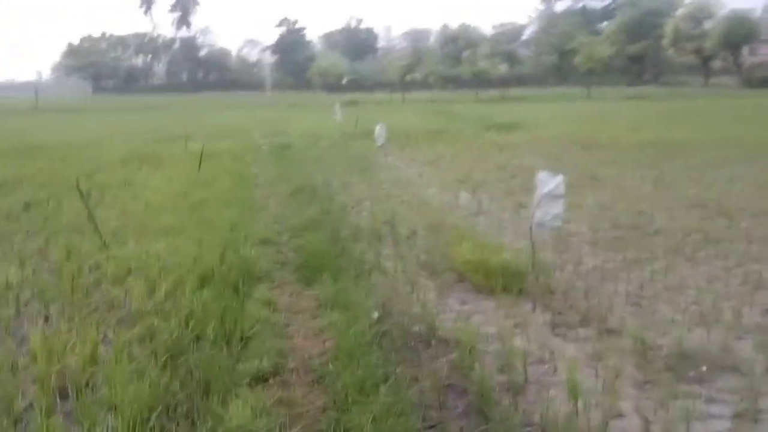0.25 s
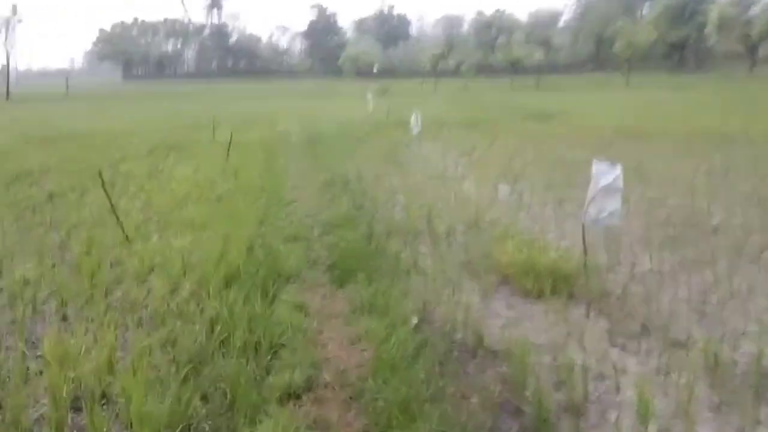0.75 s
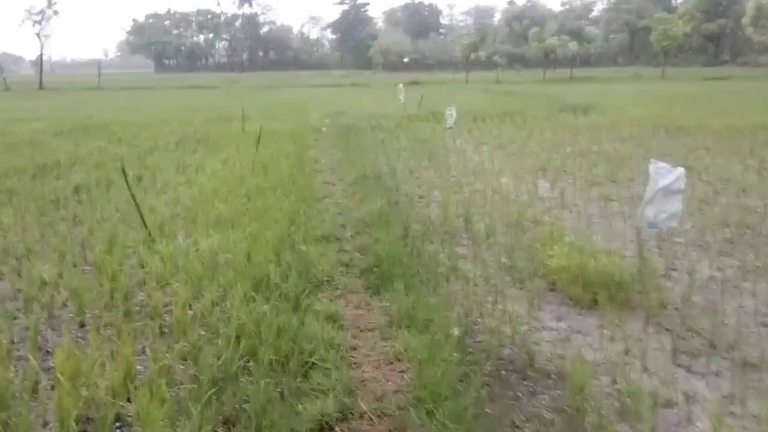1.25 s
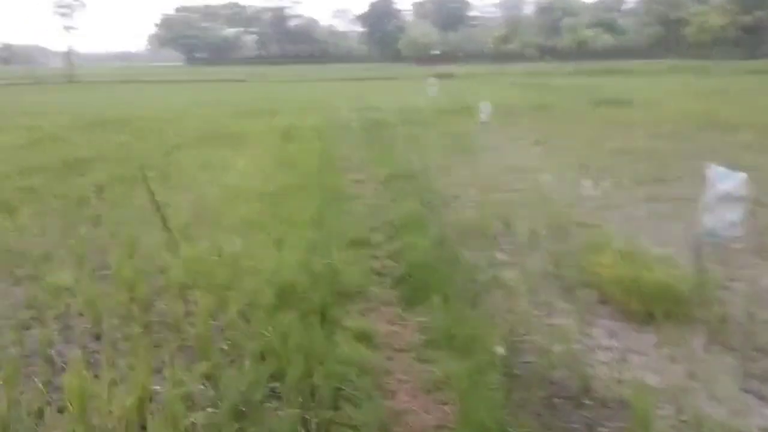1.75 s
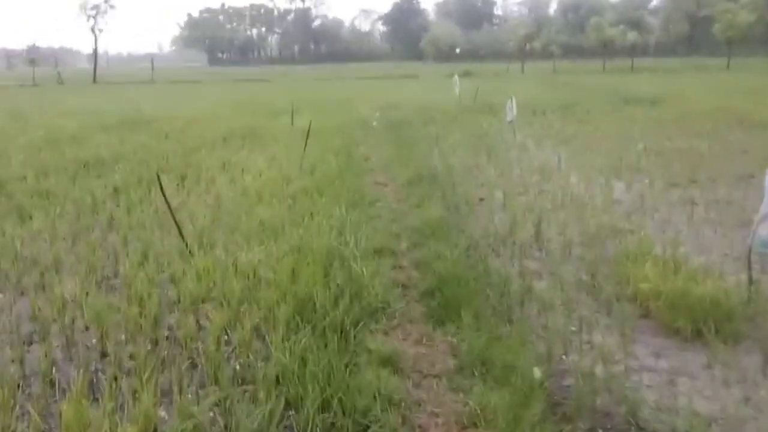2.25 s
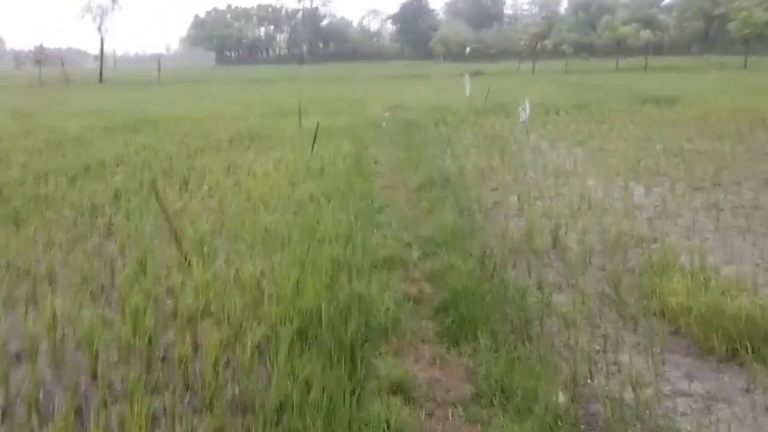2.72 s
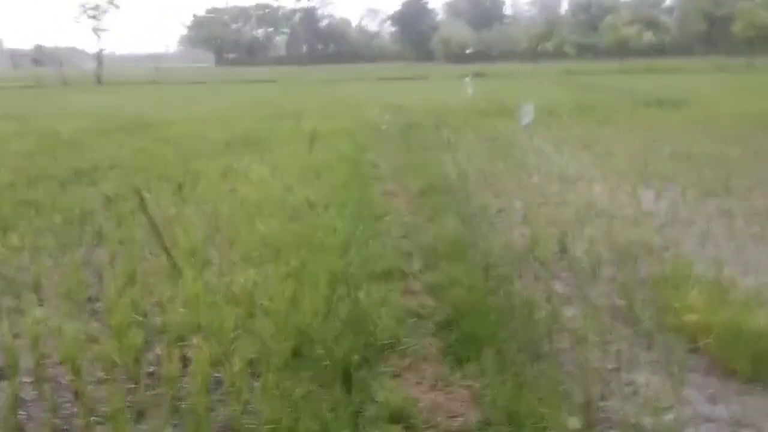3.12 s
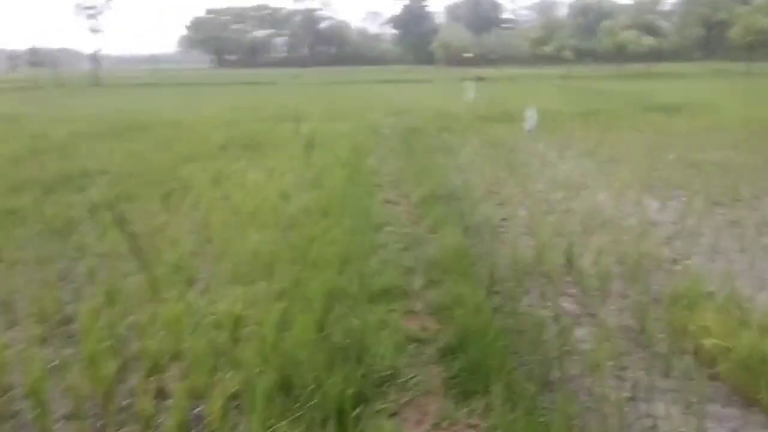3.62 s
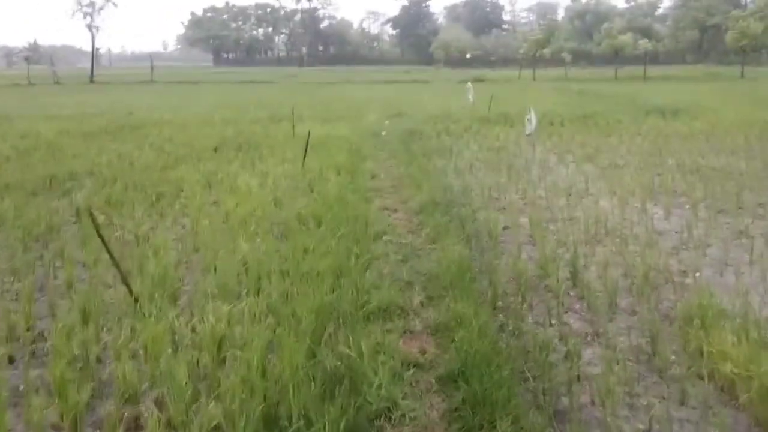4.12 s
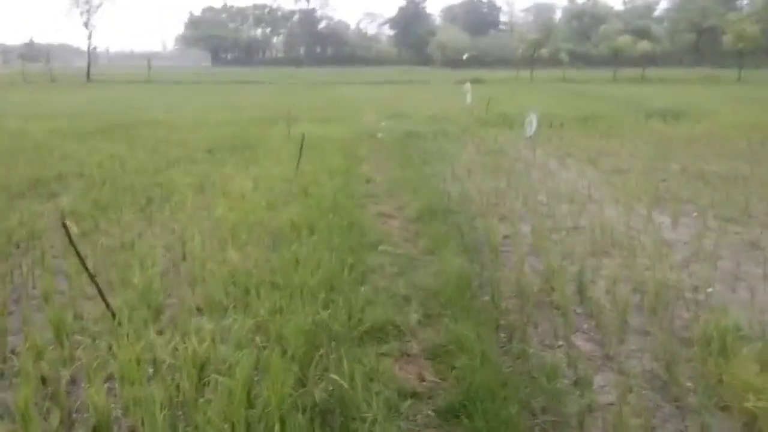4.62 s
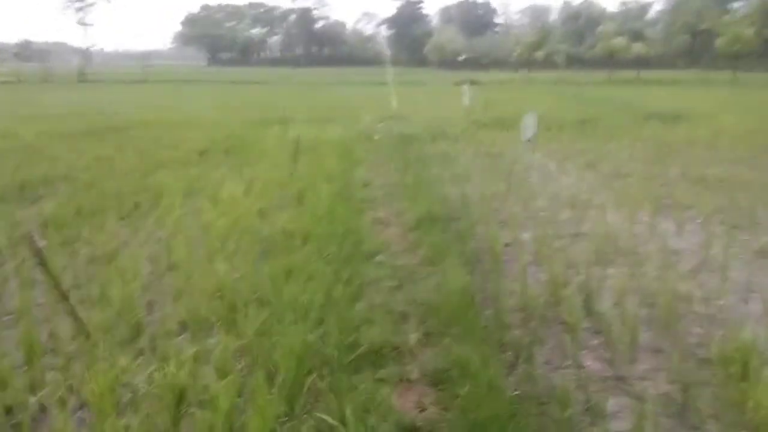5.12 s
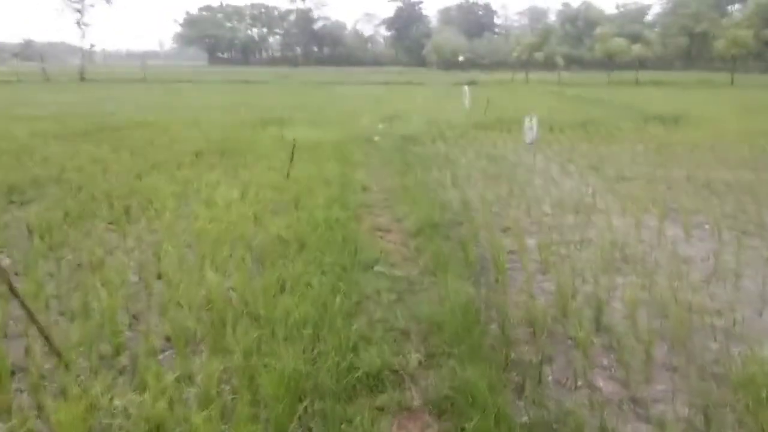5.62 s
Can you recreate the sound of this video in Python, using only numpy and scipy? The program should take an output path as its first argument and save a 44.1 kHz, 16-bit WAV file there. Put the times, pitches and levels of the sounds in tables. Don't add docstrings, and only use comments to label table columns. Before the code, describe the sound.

A phone under an umbrella in an open wet field, no reverberation. From 0 to about 1.2 s heavy rain drums densely on taut cloth, crisp overlapping taps with a dull mid-range body and thin hiss, while wind buffets the microphone in low thumps, strongest around 0.4, 0.8 and 1.13 s. Between 1.2 and 1.7 s noise suppression pushes the rain down in ragged steps; the wind dies by 2 s. Short watery, narrow-band pips remain. Drumming bursts back at about 2.4 and 2.55 s, and again near 3.15-3.4 s, fading quickly. A hard gust booms from 2.55 to 3.3 s, with violent thumps near 2.75 s. From 3.5 to 5.2 s it is nearly silent, with isolated blips and chirpy drips, some low and hollow, some bright, each sinking within a tenth of a second. At 5.3-5.8 s a final gust rumbles and thuds, peaking near 5.5 s, with few pips.

```python
import sys
import numpy as np
from scipy import signal
from scipy.fft import rfft, irfft
from scipy.io import wavfile
from scipy.ndimage import uniform_filter1d, map_coordinates

SR = 44100
rng = np.random.default_rng(int(sys.argv[2]) if len(sys.argv) > 2 else 0)


def output_pcm(signal):
    pcm = np.clip(np.atleast_2d(signal).T, -1, 1) * 32767
    wavfile.write(sys.argv[1], SR, np.round(pcm).astype(np.int16))


def voltage_ratio(decibels):
    exponent = np.asarray(decibels, float) / 20
    return 10 ** exponent


N = 258867

# (frequency [Hz], density [dB per Hz])
CLOTH_COLOUR = [(24, -50), (40, -19), (150, -2.5), (247, -1.5), (472, -1), (722, -3), (817, -0.5),
                (1380, -1), (1640, -4.5), (4030, -18), (6980, -26.5), (8960, -36), (15500, -32.5)]
RINGING_HZ = [700, 1350, 2150, 2600, 3000, 3600, 4450, 4750, 5300, 6100, 6900, 7400, 8500, 9800]
LEARNT_S = 1.155


def evened(x):
    return x / np.sqrt(np.mean(x ** 2) + 1e-20)


def read(points, hz):
    f, value = np.transpose(points)
    return np.interp(np.log(hz + 1), np.log(f + 1), value)


def add(mix, s, sound):
    part = mix[round(s * SR):][:len(sound)]
    part += sound[:len(part)]


def coloured(x, points):
    gain = voltage_ratio(read(points, np.fft.rfftfreq(len(x), 1 / SR)))
    return irfft(rfft(x) * gain, len(x))


def lumps(size, count=N):
    smooth = uniform_filter1d(rng.standard_normal(count), size)
    return evened(uniform_filter1d(smooth, size))


def tap(ripple_db, tilt_db, splash):
    hz = np.fft.rfftfreq(2048, 1 / SR)
    db = read(CLOTH_COLOUR, hz) + ripple_db * lumps(size=7, count=len(hz))
    db += tilt_db * np.log2(hz / 1000 + 0.2)
    log_gain = np.log(voltage_ratio(np.r_[db, db[-2:0:-1]]))
    pulse = np.fft.ifft(np.exp(signal.hilbert(log_gain).conj())).real[:1024]
    spray = splash * rng.standard_normal(200) * np.exp(-np.arange(200) / SR / 0.00049)
    pulse = np.convolve(pulse, np.r_[1, spray])
    return pulse / abs(pulse).max()


def large_drops():
    # (time [s], peak behind the shut suppressor [dB])
    main_drops = [(0.0651, -36), (0.1133, -35), (0.1259, -30), (0.163, -35), (0.181, -30.5), (0.2056, -31),
                  (0.2554, -30.5), (0.2735, -34), (0.3190, -36), (0.3334, -34), (0.493, -37.5),
                  (0.5045, -33), (0.54, -32), (0.6055, -43), (0.6613, -38), (0.6823, -34), (0.702, -32),
                  (0.7079, -35), (0.7186, -32), (0.7541, -31), (0.7817, -35.5), (0.8009, -37.5),
                  (0.8699, -36.5), (0.8934, -43), (1.0114, -30), (1.05, -36.5), (1.0695, -33.5),
                  (1.1102, -31.5), (1.1512, -36),
                  (1.353, -38.5), (1.5049, -35), (1.5631, -39.5), (1.885, -32.5), (2.3471, -33),
                  (2.387, -34.5), (2.438, -39), (2.638, -34.5), (2.6922, -32.5), (2.8305, -39.5),
                  (3.1821, -32.5), (3.2585, -34), (3.312, -35), (3.3441, -37), (3.9224, -34), (4.194, -30),
                  (4.3262, -35.5), (4.48, -32), (5.45, -30), (0.1823, -32.5), (4.131, -61.5), (4.15, -48)]
    downpour = [(0.0105, -37), (0.0143, -43), (0.0229, -38), (0.0714, -40), (0.0776, -35.5),
                (0.0826, -42), (0.0906, -33), (0.0939, -41), (0.1042, -33), (0.1166, -38), (0.1441, -36),
                (0.1904, -46), (0.2598, -39), (0.2811, -55), (0.2854, -35), (0.2896, -48), (0.2931, -39),
                (0.2989, -37), (0.3213, -45), (0.326, -35), (0.3297, -40), (0.341, -38), (0.3481, -38.5),
                (0.3609, -38), (0.3757, -40), (0.3805, -41), (0.4087, -51), (0.4659, -49), (0.5338, -42),
                (0.5584, -37), (0.5774, -49), (0.5863, -44), (0.5958, -38.5), (0.5999, -43),
                (0.617, -39), (0.6225, -37.5), (0.638, -44), (0.6525, -37.5), (0.6689, -39), (0.6767, -36),
                (0.68, -44), (0.6975, -41), (0.72, -49), (0.7268, -47), (0.7375, -47.5), (0.745, -37.5),
                (0.751, -40), (0.7573, -45), (0.773, -41), (0.797, -47.0), (0.83, -38), (0.8512, -43),
                (0.8659, -37.5), (0.8839, -35.5), (0.91, -41), (0.9658, -35), (0.973, -47), (0.989, -44),
                (0.9954, -51), (1.021, -37.5), (1.029, -41), (1.0458, -36), (1.0713, -58), (1.085, -40),
                (1.0926, -38.5), (1.118, -36), (1.125, -37.5), (1.1403, -36.5), (1.1888, -37)]
    easing = [(1.2403, -34), (1.2631, -35), (1.2706, -39), (1.276, -42), (1.2952, -31), (1.3035, -34.5),
              (1.3071, -35), (1.314, -33), (1.3517, -40), (1.3652, -42), (1.3687, -33), (1.3725, -48),
              (1.3833, -49), (1.3937, -32.5), (1.4315, -43), (1.4433, -43), (1.4578, -33), (1.4639, -30.5),
              (1.4754, -31), (1.4801, -34), (1.602, -41), (1.6103, -46), (1.6137, -37), (1.6348, -37.5),
              (1.6918, -33), (1.6973, -47), (1.7273, -42.5), (1.7613, -42), (1.7703, -41), (1.798, -50),
              (1.8316, -34), (1.8355, -37), (1.8401, -40), (1.9087, -48.5), (1.9719, -53), (1.9919, -37.5),
              (2.0315, -38), (2.1578, -36), (2.1617, -31), (2.1934, -40.5), (2.2285, -31.5)]
    flurry = [(2.3255, -33.5), (2.3299, -47), (2.3646, -54), (2.3763, -42.5), (2.3844, -31.5),
              (2.4148, -50), (2.4327, -37.5), (2.4606, -40), (2.4635, -35.5), (2.4725, -40), (2.4776, -36),
              (2.5134, -29), (2.5485, -33), (2.5506, -35.5), (2.5585, -40.5), (2.5647, -33), (2.5681, -37),
              (2.5721, -36.5), (2.5948, -42), (2.6209, -36), (2.6242, -36), (2.6416, -34), (2.6568, -46.0),
              (2.6671, -46), (2.7159, -39), (2.7614, -33), (2.8172, -39.5), (2.8251, -48), (2.8478, -44),
              (2.8508, -50), (2.8883, -33), (2.8943, -34.5), (2.8981, -37), (2.93, -41), (3.0012, -43),
              (3.074, -49), (3.1077, -40), (3.1546, -33.5), (3.1584, -51), (3.1701, -37), (3.1987, -37),
              (3.2051, -34), (3.2172, -32.5), (3.2445, -36), (3.3149, -46), (3.3398, -39), (3.4283, -44),
              (3.4468, -35.5), (3.4862, -32.5)]
    drips = [(3.5542, -33.5), (3.5787, -44), (3.5992, -35.5), (3.6619, -32), (3.7721, -30.5),
             (3.7758, -37.5), (3.8308, -48), (3.8597, -39), (3.884, -37), (3.9027, -29), (3.9181, -44),
             (3.9913, -32.5), (4.0841, -35), (4.0887, -38), (4.2453, -39), (4.2494, -38), (4.2547, -36),
             (4.283, -46), (4.2886, -37), (4.3323, -31.5), (4.3754, -36.5), (4.4572, -33), (4.5491, -35.5),
             (4.5544, -42), (4.6199, -38.5), (4.6522, -32.5), (4.6559, -36), (4.8379, -42), (4.8451, -38),
             (4.8772, -39.5), (4.9522, -35), (5.0388, -34), (5.0696, -39), (5.1063, -49), (5.1892, -38),
             (5.201, -37.5), (5.2739, -53), (5.2918, -31.5), (5.3333, -45), (5.3477, -48), (5.3668, -49),
             (5.3711, -29.5), (5.4045, -34), (5.4277, -42), (5.47, -29), (5.5704, -40), (5.6054, -44),
             (5.6533, -41), (5.6925, -34.5), (5.719, -31.5), (5.7545, -40), (5.8133, -47.5),
             (5.8211, -39.5), (5.8514, -36)]
    rows = main_drops
    for stretch, trim_db in [(downpour, -1.5), (easing, -3), (flurry, -1), (drips, -0.5)]:
        rows = rows + [(s, db + trim_db) for s, db in stretch]
    return rows


def umbrella():
    patter_db, patter_per_s = -59, 900
    spots = [tap(ripple_db=2.5, tilt_db=1.13 * rng.standard_normal() - 0.5, splash=0.08) for _ in range(16)]
    hits = rng.random(N) < patter_per_s / SR
    size = voltage_ratio(5.9 * np.minimum(rng.exponential(1, N), 3.0)) * hits
    spot = rng.integers(0, len(spots), N)
    patter = sum(signal.oaconvolve(size * (spot == k), p)[:N] for k, p in enumerate(spots))
    out = voltage_ratio(patter_db) * evened(patter)

    near = [tap(ripple_db=1.0, tilt_db=-0.4, splash=0.14) for _ in spots]
    near = [p - 0.0094 * np.roll(p, 22) for p in near]
    soft = signal.sosfilt(signal.butter(2, 3500, fs=SR, output="sos"), near)
    for k, (s, peak_db) in enumerate(large_drops()):
        crisp = np.interp(peak_db, [-60, -31.5], [.25, 1])
        if s > LEARNT_S:
            crisp *= 0.81
        j = k % len(near)
        add(out, s - .0003, voltage_ratio(peak_db - 2.5) * (crisp * near[j] + (1 - crisp) * soft[j]))
    return out


def wind():
    # (time [s], level [dB])
    gusts = [
        [(0.0, -29.5), (0.36, -36), (0.438, -27), (0.6, -26), (1.15, -23.5), (1.425, -28.5), (1.608, -40.5),
         (1.66, -36.5), (1.982, -68)],
        [(2.078, -72), (2.119, -47), (2.287, -58), (2.525, -77)],
        [(2.557, -23), (2.624, -31), (2.745, -16.5), (2.8, -26), (2.949, -33), (2.995, -25.5), (3.187, -27),
         (3.3, -36.5), (3.515, -70)],
        [(5.251, -71), (5.28, -39), (5.373, -33), (5.499, -16), (5.657, -31.5), (5.715, -24.5), (5.761, -36.5),
         (5.808, -26.5), (5.869, -52)],
    ]
    # (frequency [Hz], density [dB per Hz])
    buffet_colour = [(18, -53.5), (30, -35.5), (90, -1.5), (200, -3.5), (326, -9.5), (377, -20.5),
                     (531, -37.5), (606, -65), (700, -40.5), (910, -86), (1540, -120)]
    # (time [s], peak [dB], pitch [Hz])
    thumps = [(0.4358, -8.5, 155), (0.519, -13.5, 144), (0.7013, -13.5, 153), (0.7219, -13.5, 200),
              (0.7978, -7.5, 170), (0.88, -12.5, 245), (0.901, -14, 130), (1.135, -5.5, 160),
              (0.064, -17, 164), (0.408, -15.5, 149), (0.483, -18, 164), (1.657, -19.5, 116),
              (2.117, -27, 88), (2.711, -15.5, 202), (2.7309, -7.5, 260), (2.7429, -5, 187),
              (2.749, -5, 196), (2.76, -9, 204), (2.976, -18.5, 150), (2.988, -13, 150),
              (2.9962, -9.5, 138), (3.007, -12, 157), (3.0161, -11, 144), (3.034, -15, 131),
              (3.049, -15, 130), (3.089, -12.5, 155), (3.182, -7.5, 190), (5.3664, -15, 126),
              (5.383, -8.5, 173), (5.4049, -12, 172), (5.452, -8, 161), (5.499, -2, 159), (5.536, -7, 219),
              (5.544, -21, 133), (5.596, -12, 140), (5.626, -14.5, 172), (5.714, -15.5, 119)]
    s, level_db = np.concatenate(gusts).T
    gust_db = np.interp(np.arange(N) / SR, s, level_db)
    roar = evened(coloured(rng.standard_normal(N), buffet_colour)) * voltage_ratio(3.2 * lumps(size=400))
    deep = signal.sosfiltfilt(signal.butter(2, 130, fs=SR, output="sos"), roar)
    slack_db = np.clip(gust_db + 13.5, -30, 0)
    out = voltage_ratio(gust_db - 3.0) * (deep / voltage_ratio(0.19 * slack_db) + (roar - deep) * voltage_ratio(0.83 * slack_db))
    t = np.arange(-600, 1500) / SR
    for s, peak_db, hz in thumps:
        turns = t * hz / np.where(t < 0, .45, 1.1)
        add(out, s + t[0], voltage_ratio(peak_db - 5.5) * np.exp(-turns ** 2) * np.cos(2 * np.pi * hz * t))
    return signal.sosfilt(signal.butter(2, 70, "high", fs=SR, output="sos"), out)


def field():
    # (frequency [Hz], gain [dB])
    field_colour = [(100, -3.5), (600, -6.5), (2000, -3), (5000, 2), (9000, 9), (15000, 2.5)]
    hiss = coloured(coloured(rng.standard_normal(N), CLOTH_COLOUR), field_colour)
    return voltage_ratio(-68.5 + lumps(size=900)) * evened(hiss)


def sprung_bands():
    # (time [s], centre [Hz], width [Hz], lift [dB])
    surprises = [(1.27, 603, 218, 18), (1.454, 600, 625, 19), (1.497, 910, 1470, 15.5),
                 (1.558, 800, 550, 18), (1.626, 1320, 357, 25), (1.684, 1370, 374, 17),
                 (1.752, 1244, 292, 22.5), (1.831, 715, 816, 33.5), (1.965, 1360, 304, 26),
                 (2.152, 1330, 296, 18), (2.219, 374, 296, 29), (2.34, 793, 400, 16),
                 (2.376, 1390, 624, 15.5), (2.631, 895, 1450, 23), (2.712, 418, 206, 53.5),
                 (2.812, 804, 1230, 24), (2.885, 1000, 392, 14), (3.067, 876, 211, 25.5),
                 (3.305, 527, 750, 21), (3.656, 602, 207, 30), (3.763, 1610, 289, 28),
                 (3.913, 826, 676, 30), (4.945, 147, 130, 26), (4.123, 1157, 290, 34),
                 (4.143, 440, 187, 38.5), (4.435, 296, 226, 20), (4.47, 376, 233, 23.5),
                 (4.645, 490, 457, 30.5), (4.947, 434, 272, 41.5), (5.748, 1390, 214, 29)]
    # (time [s], centre
    # [Hz], width [Hz], lift [dB])
    further_bands = [(4.51, 12400, 3600, 13), (0.535, 11500, 8500, 0), (4.94, 14800, 2000, 14),
                     (1.555, 13800, 3230, 20), (2.38, 6140, 3880, 6), (2.565, 11700, 3500, 5),
                     (2.2, 11000, 6000, 16), (1.26, 2060, 1520, 4.5), (0.5, 10700, 8340, 12),
                     (0.698, 12800, 8200, 20), (0.98, 5230, 4940, 7.5), (1.358, 6120, 302, 28),
                     (1.45, 4260, 557, 18), (1.45, 7040, 700, 23), (1.554, 6900, 2760, 25.5),
                     (1.625, 3484, 263, 38), (1.683, 2440, 382, 30), (1.826, 2150, 695, 14),
                     (2.201, 8630, 480, 20), (2.208, 6730, 388, 37), (2.261, 3620, 218, 37),
                     (2.631, 6800, 3540, 11), (2.884, 6820, 2600, 25.5), (3.2, 7660, 600, 21),
                     (3.762, 7300, 733, 27.5), (3.911, 1860, 473, 34.5), (3.914, 6500, 647, 30.5),
                     (4.139, 3360, 304, 33), (4.241, 2250, 216, 22), (4.432, 6850, 1030, 30),
                     (4.51, 13150, 500, 20), (4.642, 1210, 480, 25.5), (4.831, 14600, 2600, 29),
                     (4.945, 3390, 220, 31), (5.281, 2610, 302, 28.5), (5.463, 7020, 1410, 32.5),
                     (5.462, 11450, 1490, 34)]
    # (time [s], centre [Hz], lift [dB])
    pings = [(4.32, 3040, 23), (1.27, 2100, 12), (1.451, 2430, 26), (1.553, 2850, 27), (1.602, 2640, 31),
             (4.944, 5300, 30), (1.76, 1920, 31), (1.824, 3640, 15), (2.222, 2050, 27), (2.337, 2605, 29),
             (2.754, 3390, 23.5), (2.885, 4554, 43), (2.884, 2610, 12), (3.244, 4500, 30), (4.32, 4420, 15),
             (3.765, 442, 22), (3.913, 2700, 41), (3.911, 8600, 41), (3.919, 422, 36.5),
             (4.119, 7850, 37.5), (4.14, 4500, 32), (4.186, 3600, 35.5), (4.319, 520, 22.5),
             (4.322, 2540, 29), (4.47, 2650, 27), (4.651, 1860, 14), (4.944, 796, 29.5), (5.362, 2265, 26),
             (5.362, 3690, 32), (5.443, 474, 28),
             (1.995, 1260, 11), (2.022, 560, 19), (2.184, 610, 30), (2.262, 1360, 20),
                 (2.32, 655, 14.5), (2.546, 487, 7), (3.15, 450, 20.5), (3.617, 1380, 25),
                 (3.895, 1083, 19), (3.914, 230, 34), (4.01, 1370, 31), (4.08, 240, 18), (4.243, 344, 18),
                 (4.241, 910, 14), (4.32, 800, 17), (5.443, 1260, 13), (5.845, 1070, 16), (5.75, 900, 23),
                 (1.715, 470, 26), (1.606, 580, 17), (1.945, 310, 15), (3.86, 13000, 38), (4.02, 13800, 29),
                 (4.37, 10950, 38), (5.462, 4870, 18), (3.6, 7320, 30)]
    narrow_hz, echoes_each, echo_share, echo_fade_s = 151, 6, 1.51, 4.04
    echoes = []
    for s, _, _, db in surprises:
        for _ in range(echoes_each):
            lift_db = echo_share * np.exp(-s / echo_fade_s) * db * rng.random()
            echoes.append((s, rng.choice(RINGING_HZ[2:]), narrow_hz, lift_db))
    return surprises + further_bands + echoes + [(s, f, narrow_hz, db) for s, f, db in pings]


def zone_lift(hz, t, open_db, learnt, full_db):
    zones_hz = (350, 3700, 4100, 7500, 8800)
    # (start [s], length [s], depth [dB])
    lulls = [
        (0.203, 0.017, 3),
    ]
    part = np.maximum(open_db, 0) / full_db
    middle = 0.95 * full_db * part ** 2.12
    top = 0.37 * full_db * part ** 0.39 * (1 - 0.21 * learnt)
    lull_db = sum(db * np.exp(-(2 * (t - s) / length - 1) ** 4) for s, length, db in lulls)
    low, middle = open_db - lull_db, middle - lull_db
    zones = np.array([low, low, middle, middle, np.maximum(top - lull_db, 0)])
    place = np.interp(hz, zones_hz, np.arange(len(zones_hz)))
    return map_coordinates(zones, np.meshgrid(place, np.arange(len(t)), indexing="ij"), order=1)


def lingering(noise, frames, fade_s, frame_s):
    smooth = uniform_filter1d(uniform_filter1d(noise, size=2, axis=0), size=frames, axis=1)
    return evened(signal.lfilter([1], [1, -np.exp(-frame_s / fade_s)], smooth, axis=1))


def tripped_lift(hz, t, open_db, wide_db, learnt, full_db):
    noise = rng.standard_normal((len(hz), len(t)))
    glints = lingering(noise[:, ::-1], frames=13, fade_s=0.051, frame_s=t[1])
    trips = lingering(noise, frames=9, fade_s=0.054, frame_s=t[1])
    prone = sum(np.exp(-((hz - f) / 130) ** 2) for f in RINGING_HZ)[:, None]
    trips = trips + 0.25 * (prone - .4)
    hz = hz[:, None]
    opened = np.maximum(wide_db, 0)
    half_open = np.clip(wide_db / (full_db - 2.2 * hz / 15750), 0, 1)

    trip_db = 13.6 * (0.96 + 0.04 * learnt) * np.interp(hz, [1500, 2500], [0.74, 1])
    trip_db = trip_db * np.sqrt(half_open) * (1 - 0.77 * half_open)
    lift_db = wide_db + trip_db * (0.85 * np.maximum(trips - .2, 0) - .45)

    stir = signal.lfilter([t[1] / 0.22], [1, t[1] / 0.23 - 1], np.tanh(np.maximum(open_db, 0) / 4))
    eager = glints - 1.09 - 0.44 * (1 - stir) + 0.65 * (hz / 15750) ** 3 + 0.67 * (1 - learnt)
    lift_db += 15 * np.tanh(2.3 * np.maximum(eager, 0)) * np.clip(hz / 9000, 0, 1) ** 3

    lift_db -= 0.2 * learnt * opened * (1 - np.minimum(prone, 1)) * (hz > 850)
    lift_db -= 12 * half_open * np.maximum(-trips - .6, 0)
    lift_db -= 0.4 * learnt * opened * (np.clip(.6 - trips, 0, 1) - .3)
    return lift_db


def suppressor(rain):
    # (time [s], lift [dB])
    opening = [(0.0, 26), (0.34, 29), (0.724, 30), (1.03, 27), (1.187, 26.5), (1.234, 15.5), (1.355, 22),
               (1.415, 11.5), (1.7, 1.5), (2.313, 5), (2.401, 24.5), (2.53, -3), (2.552, 27.5),
               (2.763, 2.5), (3.144, 4), (3.168, 26), (3.275, 17.5), (3.499, -2)]
    # (start [s], centre [Hz], lift [dB])
    leans = [(0.22, 372, -8.5), (0.32, 374, -13), (1.17, 1720, -15), (1.22, 2210, -15), (1.33, 950, 9.5),
             (1.34, 1254, 19.5), (1.33, 1570, -14), (1.49, 1350, 18.5), (1.49, 3600, -12),
             (1.826, 1080, 9.5), (2.32, 3120, 16), (2.375, 1900, 13), (2.54, 1040, -17), (2.62, 1126, -41),
             (2.63, 2140, 14.5), (2.63, 3180, -17), (2.63, 1390, 6.5), (3.299, 1180, 15.5), (3.36, 516, -9),
             (2.88, 7150, 9), (1.6, 4780, 23), (4.01, 4400, 15), (1.7, 3600, 18), (2.2, 4600, 21)]
    full_db, shut_s, lean_s, lean_width_hz = 32, 0.081, 0.082, 117
    bands_hz, t, z = signal.stft(rain, SR, nperseg=512, noverlap=448)
    hz = bands_hz[:, None]
    open_db = np.interp(t, *np.transpose(opening))
    learnt = np.clip((t - LEARNT_S) / 0.048 + .5, 0, 1)
    wide_db = zone_lift(bands_hz, t, open_db, learnt, full_db)
    lift_db = tripped_lift(bands_hz, t, open_db, wide_db, learnt, full_db)

    power = signal.lfilter([1], [1, -.7], (abs(z[8:60]) ** 2).sum(0))
    frame_db = 10 * np.log10(power + 1e-12)
    snap = np.interp(hz, [1500, 7000, 9500], [0.37, 0.64, 0.23])
    lift_db += snap * np.tanh(wide_db / 3.4) * (frame_db - np.median(frame_db))
    lift_db *= np.clip(hz / 330, 0, 1) ** 2

    for start, centre_hz, width_hz, db in sprung_bands():
        span = slice(np.searchsorted(t, start - .004), np.searchsorted(t, start + .3))
        age = t[span] - start
        fade_s = shut_s * (0.91 if start > opening[-1][0] else 1)
        sinking = 1.012 * np.exp(-age / fade_s) + 0.088 * np.exp(-age / 0.014)
        sinking_db = np.clip(age / 0.0027 + 0.098, 0, 1) * db * sinking
        ragged = np.clip(lumps(size=2, count=len(hz)), -2, 1)[:, None]
        comb = 1 + 0.29 * ragged * min(width_hz / 1000, 1)
        lift_db[:, span] += comb * np.exp(-(2.04 * (hz - centre_hz) / width_hz) ** 4) * sinking_db

    for start, centre_hz, db in leans:
        band = np.exp(-((hz - centre_hz) / lean_width_hz) ** 2)
        lift_db += db * band * np.exp(-(2 * (t - start) / lean_s - 1) ** 4)
    gain = voltage_ratio(np.clip(lift_db, -1, 37.0)) * (hz < 15750)
    return signal.istft(z * gain, SR, nperseg=512, noverlap=448)[1][:N]


def scene():
    return (suppressor(umbrella() + field()) + wind())[None]


def band_limit(x):
    return signal.sosfilt(signal.butter(12, 16510, fs=SR, output="sos"), x)


def record(dry):
    ceiling = 0.55
    mix = ceiling * np.tanh(dry / ceiling)
    return band_limit(mix)


dry = scene()
out = record(dry)
output_pcm(out)
```